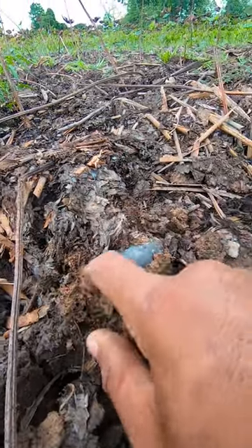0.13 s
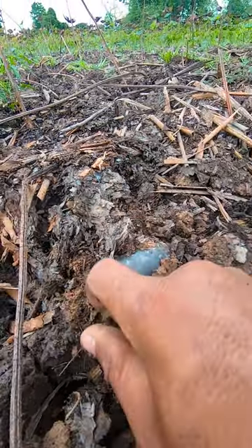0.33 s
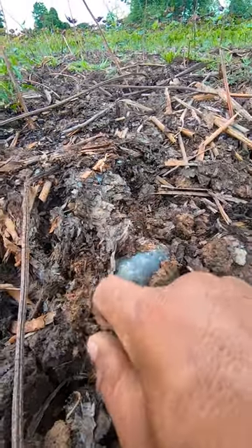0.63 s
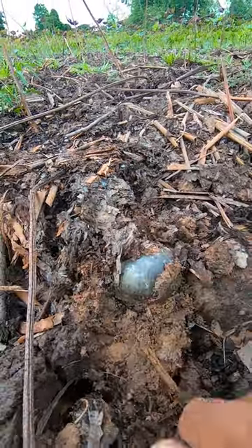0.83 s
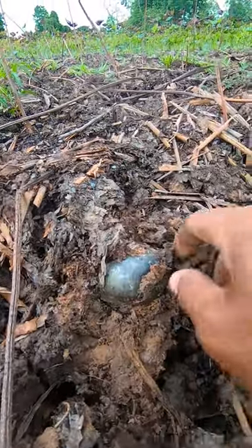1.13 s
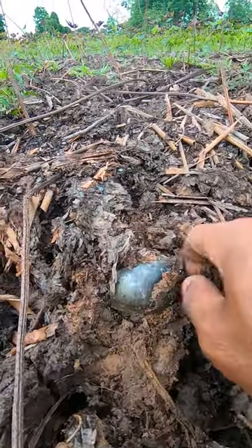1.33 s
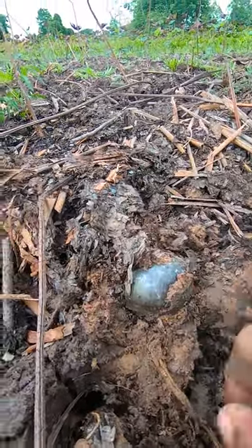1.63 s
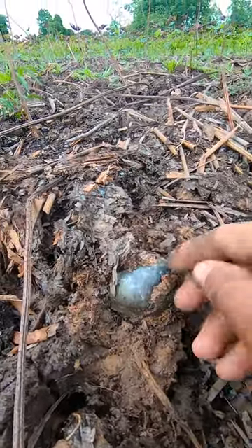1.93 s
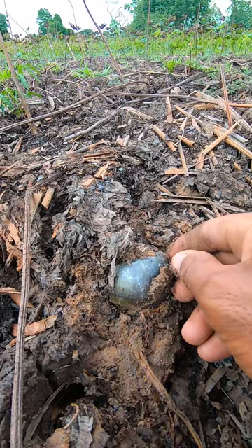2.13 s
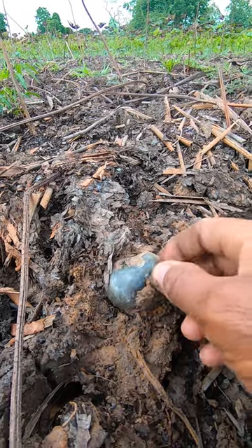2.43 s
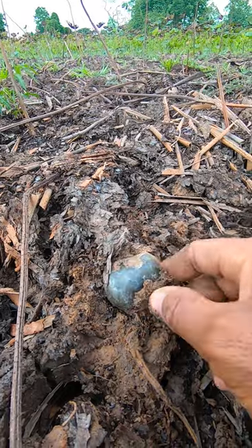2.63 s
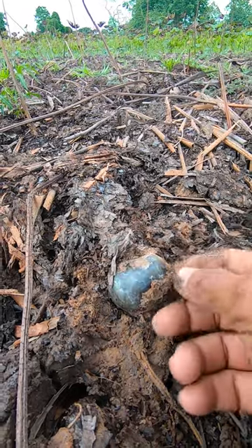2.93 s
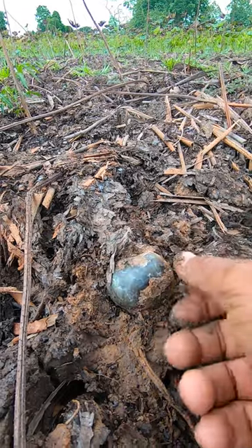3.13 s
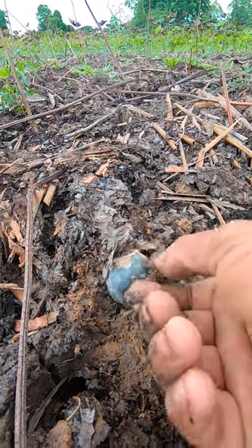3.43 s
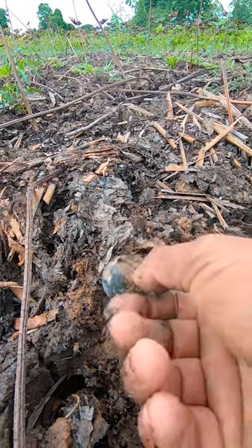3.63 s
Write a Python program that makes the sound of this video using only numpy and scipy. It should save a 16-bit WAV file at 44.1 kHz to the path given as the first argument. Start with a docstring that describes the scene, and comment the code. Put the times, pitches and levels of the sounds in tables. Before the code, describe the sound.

Gritty hand digging in dry earth with snapping twigs and crumbling grains, busiest from 0.8 to 1.9 seconds, then sparse light touches; open field, far hooting bird, soft wind buffeting the close stereo microphone.

```python
"""Outdoors, over a faint wide hush, a light wind booms in the housing of a small stereo microphone.
Far off one bird hoots in groups of three or four, and other birds whistle in short glides (sines, echoed).
A hand scrapes dry soil and litter, lightly at first, then digs hardest near 1.6 s and eases off:
trains of tiny rings for the breaking grains, with ticks, rings and dust puffs for snapping twigs."""
import sys
import numpy as np
from scipy import signal
from scipy.io import wavfile
from scipy.ndimage import uniform_filter1d

SR = 44100
rng = np.random.default_rng(int(sys.argv[2]) if len(sys.argv) > 2 else 0)


def linear_from_db(decibels):
    """Turn decibels (scalar or array-like) into linear amplitude factors; 0 gives 1."""
    return 10 ** (np.asarray(decibels, float) / 20)


def waveform_to_disk(signal):
    """Save audio, clipped to [-1, 1], as 16-bit WAV at the path in sys.argv[1]."""
    frames = np.transpose(np.atleast_2d(signal))
    scaled = np.clip(frames, -1, 1) * 32767
    samples = np.round(scaled).astype(np.int16)
    wavfile.write(sys.argv[1], SR, samples)


N = 166257


def evened(x):
    """Scales to unit rms."""
    return x / np.sqrt(np.mean(x ** 2) + 1e-20)


def read(points, hz):
    """Interpolates a spectrum table on a log-frequency axis."""
    f, value = np.transpose(points)
    return np.interp(np.log(hz + 1), np.log(f + 1), value)


def curve(table, t, axis):
    """One column of a control table at times t."""
    rows = np.array(table)
    return np.interp(t, rows[:, 0], rows[:, axis])


def drift(size):
    """Slow random curve of unit rms, smoothed twice over size samples."""
    once = uniform_filter1d(rng.standard_normal(N), size=size)
    return evened(uniform_filter1d(once, size=size))


def add(mix, s, sound):
    """Mixes a mid-side sound in at time s."""
    part = mix[:, round(s * SR):][:, :sound.shape[1]]
    part += sound[:, :part.shape[1]]


def ping(hz, cycles):
    """A ring of a few cycles that starts and dies softly, peak near 1."""
    u = np.arange(int(4 * cycles * SR / hz) + 8) * hz / SR / cycles
    envelope = (1.45 * np.e * u) ** 2 * np.exp(-3 * u)
    return envelope * np.sin(2 * np.pi * cycles * u)


def field(shape_db, patch_db, size):
    """Mid and side noise from a level field over frequency and time, with drifting patches."""
    hop = size // 4
    hz = np.fft.rfftfreq(size, 1 / SR)[:, None]
    t = np.arange(N // hop + 5) * hop / SR
    a, b, c, d, patch = rng.standard_normal((len(t), len(hz), 5)).T
    patch = uniform_filter1d(patch, size=8, axis=0)
    patch = evened(uniform_filter1d(patch, size=8, axis=1))
    z = np.array([a + 1j * b, c + 1j * d]) * linear_from_db(shape_db(hz, t) + patch_db * patch)
    return signal.istft(z, nperseg=size, noverlap=size - hop)[1][:, :N]


def air():
    """The faint wide hush of the open field: shaped noise, independent in mid and side."""
    # spectra, relative: (frequency [Hz], level [dB per Hz])
    mid_spectrum = [(260, -36.5), (450, -33), (548, -3), (768, 9), (1190, -8.5), (3610, -15), (6340, -7.5),
                    (8890, -11.5), (10400, -29), (11000, -47.5), (13000, -62.5)]
    side_spectrum = [(260, -35.5), (450, 0), (572, -10.5), (747, 5.5), (1140, -8.5), (1600, -10),
                     (3370, -26), (5670, -25.5), (8520, -33), (11000, -39.5), (13000, -69.5)]
    mid_rms_db, side_rms_db, patch_db = -78.5, -69.5, 3.5

    def shape_db(hz, t):
        return np.array([read(mid_spectrum, hz), read(side_spectrum, hz)])

    mid, side = field(shape_db, patch_db, size=1024)
    return np.array([linear_from_db(mid_rms_db) * evened(mid), linear_from_db(side_rms_db) * evened(side)])


def note(db, hz, side_db, rise):
    """A soft-edged sine on the pitch curve hz, wavering and flickering with the air on its way."""
    waver_share, flicker_db_per_hz = .004, .0006
    u = np.linspace(0, 1, len(hz))
    slow = uniform_filter1d(rng.standard_normal((2, len(hz))), size=300)
    waver, flicker = evened(uniform_filter1d(slow, size=300))
    phase = 2 * np.pi * np.cumsum(hz * (1 + waver_share * waver)) / SR
    envelope = np.minimum(np.minimum(u / rise, 6 * (1 - u)), 1)
    level = linear_from_db(db + flicker_db_per_hz * hz * flicker) * np.sqrt(2) * envelope
    return level * np.array([np.sin(phase), linear_from_db(side_db) * np.cos(phase)])


def birds():
    """Hoots rise into their pitch; whistles glide; trees return a blurred echo."""
    # hooting bird: (start [s], length [s], mid level [dB], peak pitch [Hz])
    hoots = [(0.116, 0.067, -79.5, 955), (0.257, 0.08, -70.5, 957), (0.382, 0.078, -66.5, 978),
             (0.507, .062, -66.5, 990), (1.216, 0.062, -71, 952), (1.344, 0.056, -66, 983),
             (1.469, 0.038, -63.5, 980), (2.148, 0.053, -69.5, 924), (2.27, 0.05, -66, 968),
             (2.388, 0.047, -63.5, 979), (3.086, 0.057, -74, 937), (3.203, 0.057, -70.5, 984),
             (3.325, 0.052, -68.5, 973)]
    # other birds: (start [s], length [s], mid level [dB], first pitch [Hz], last pitch [Hz])
    whistles = [(.21, 0.09, -84, 1475, 1560), (.318, 0.12, -75.5, 1500, 1570), (0.21, 0.16, -80, 1030, 990),
                (0.499, .14, -80, 4170, 4440), (1.392, 0.06, -68, 3330, 3070),
                (1.85, 0.052, -69.5, 1894, 2100), (1.955, 0.032, -70, 2120, 1920),
                (2.955, 0.21, -87, 5200, 5700), (3.09, 0.08, -88, 5100, 5300),
                (2.965, 0.075, -86, 4600, 4550), (3.165, 0.05, -79, 4950, 4680),
                (3.474, 0.028, -73.5, 2980, 2870), (3.504, 0.05, -69, 3340, 3030),
                (3.548, 0.039, -80, 3010, 3130), (3.724, 0.021, -72.5, 2760, 2770),
                (3.749, 0.026, -69, 3350, 3090)]
    hoot_arch, hoot_side_db, hoot_rise = .11, -1, .3  # rise: share of a note spent swelling
    whistle_side_db, whistle_rise = -7.5, 0.1
    echo_db, echo_decay_s = -9, 0.048
    out = np.zeros((2, N))
    for s, length_s, db, hz in hoots:
        u = np.linspace(0, 1, int(length_s * SR))
        pitch_hz = hz * (1 - hoot_arch * (1.7 * u - 1) ** 2)
        add(out, s, note(db, pitch_hz, hoot_side_db, hoot_rise))
    for s, length_s, db, first_hz, last_hz in whistles:
        pitch_hz = np.linspace(first_hz, last_hz, int(length_s * SR))
        add(out, s, note(db, pitch_hz, whistle_side_db, whistle_rise))
    t = np.arange(SR // 4) / SR
    echo = rng.standard_normal((2, len(t))) * np.exp(-t / echo_decay_s)
    echo = echo / np.linalg.norm(echo[0])
    return out + linear_from_db(echo_db) * signal.fftconvolve(out, echo, axes=1)[:, :N]


def wind():
    """Gusts excite a broad low resonance, almost alike at both ports, with a deeper flutter under it."""
    # gusts: (time [s], boom level [dB], low flutter share [dB, about its mean])
    gusts = [(0.02, -33, -18), (0.21, -37.5, -10), (0.53, -27.5, -20), (0.7, -42.5, -3), (0.75, -35, -13),
             (1.04, -40, -16.5), (1.52, -37, -13), (1.97, -41.5, -17), (2.11, -40.5, -10.5),
             (2.14, -37.5, -26.5), (2.88, -43, -16.5), (2.95, -47, -12), (3.45, -36, -30), (3.48, -34, -16),
             (3.74, -35.5, -18)]
    # boom spectrum, relative: (frequency [Hz], level [dB per Hz])
    boom = [(18, -44.5), (34, -38), (54, -15.5), (108, -16), (143, -4.5), (176, 4), (208, -4.5),
            (436, -38.5), (515, -55), (560, -58), (730, -79), (1230, -120)]
    # boom width: (frequency [Hz], side over mid [dB])
    boom_width = [(40, -29.5), (100, -19.5), (170, -35), (300, -13.5), (500, -6.5)]
    flutter_below_hz, patch_db = 110.9, 0.94
    top_above_hz, top_follows = 250, .4  # the top follows this share of the gusts' dB swing
    side_lean = -0.048

    def shape_db(hz, t):
        gust_db, flutter_db = curve(gusts, t, axis=1), curve(gusts, t, axis=2)
        mid_db = read(boom, hz) - 200 * (hz > boom[-1][0])  # silent above the table
        mid_db = mid_db + (hz < flutter_below_hz) * (flutter_db - flutter_db.mean())
        mid_db = mid_db - (hz > top_above_hz) * (1 - top_follows) * (gust_db - gust_db.mean())
        return np.array([mid_db, mid_db + read(boom_width, hz)])

    mid, side = field(shape_db, patch_db, size=4096)
    level = linear_from_db(curve(gusts, np.arange(N) / SR, axis=1))
    return np.array([mid, side + side_lean * mid]) / np.std(mid) * level


def snaps():
    """Twigs and crumbs snap: each is a tick, a short ring and a puff of loosened dust."""
    # (time [s], ring level before panning [dB], ring centre [Hz], ring length [cycles], left over right [dB])
    snap_table = [(0.047, -48.5, 4180, 5.6, 1), (0.1804, -38.5, 9000, 4.8, -2.5),
                  (0.2944, -40.5, 6260, 1.9, 10.5), (.47, -42, 6130, 2.1, 13), (0.49, -41, 5930, 2.9, 9),
                  (0.823, -29, 6000, 0.46, -7), (0.858, -43, 4500, .5, -9), (0.822, -38, 1670, 0.88, -18),
                  (0.858, -37.5, 1320, 1, -10), (.899, -47.5, 1490, 4.2, -18), (.927, -45, 5100, 2.1, 2),
                  (.961, -37, 5000, .5, 10), (1.031, -43.5, 1330, 1.3, -14), (1.09, -48, 2580, 4.1, 2),
                  (1.211, -32.5, 2670, 2.1, -6), (1.243, -45.5, 2580, 4.4, -3),
                  (1.275, -39.5, 3040, 3.9, -2), (1.31, -47, 3220, 1.8, 1), (1.338, -38.5, 5030, 1.1, 5),
                  (1.381, -44, 4500, .6, -2), (1.243, -43, 7000, .6, -3), (1.534, -50, 2100, 2, -3),
                  (1.5541, -35, 1070, 1.05, -18), (1.563, -30, 3450, 5, -3),
                  (1.6025, -29, 1260, 1.35, -7.5), (1.6578, -22, 5070, 0.4, -4), (1.702, -44, 1390, 2, -10),
                  (1.743, -44.5, 2570, 1.1, -10), (1.711, -46, 1680, 1.8, -11), (1.807, -55, 5500, 2.4, 0),
                  (1.932, -46.5, 2800, 1, -6), (2.249, -51, 5500, 1, 1), (2.231, -40, 6400, 2, -7.5),
                  (2.398, -36, 6740, 1.4, -13.5), (2.398, -44.5, 820, 1.5, -12), (2.619, -50, 4750, 1.5, 4),
                  (2.6466, -40, 7000, 1.3, 14), (2.466, -50.5, 3200, 0.87, -3), (3.165, -50.5, 6000, 4, 5),
                  (3.2921, -47, 1500, 0.77, -5), (3.461, -45, 7500, 2, 13.5), (3.509, -58, 4500, .5, 0)]
    tick_db, tick_hz = -5, 7000
    dust_db, dust_decay_s, dust_cycles = -17, .003, .7
    left_lag_s = .00005
    out, t = np.zeros((2, N)), np.arange(2000) / SR
    tick = ping(tick_hz, 0.3)
    noise = rng.standard_normal((len(snap_table), len(t)))
    for (s, db, hz, cycles, pan_db), puff in zip(snap_table, noise):
        ring = ping(hz, cycles)[:len(t)]
        speck = ping(hz, dust_cycles)
        dust = np.convolve(puff, speck / np.linalg.norm(speck))[:len(t)]
        x = linear_from_db(dust_db) * np.exp(-t / dust_decay_s) * dust
        x[:len(ring)] += ring
        x[:len(tick)] += linear_from_db(tick_db) * tick
        left = linear_from_db(pan_db / 2) * np.interp(t - left_lag_s, t, x, left=0)
        right = linear_from_db(-pan_db / 2) * x
        add(out, s, linear_from_db(db) * np.array([left + right, left - right]) / 2)
    return out


def scrape():
    """Clumped grains of many sizes break under the fingers, each from its own direction."""
    # hand: (time [s], pressure [dB], brightness [dB per octave], clod share [dB], left over right [dB])
    hand = [(.02, -67.5, 0, -12, -4), (.06, -67.5, 4.5, 5, -1), (.14, -73.5, 3.5, -2, 0),
            (.19, -80, -1.5, -7, 1), (.28, -78.5, 1.5, 8.5, -3), (.32, -71, 2, 1, -3),
            (.43, -73, 1, 3.5, -2), (.47, -59, 3, 2, -4), (.52, -75, -2.5, 0.5, -2),
            (.69, -78.5, 2.5, -1.5, -1), (.76, -61.5, -2, -7, -2), (.79, -50.5, -1.5, -4.5, -8),
            (.89, -52.5, -2, -2.5, -5), (.93, -57.5, 1, 0.5, -9.5), (1.12, -56.5, -2, -11.5, -1),
            (1.17, -59.5, 2, -1.5, -3), (1.37, -60, 1.5, -14, -2.5), (1.41, -70, 1, -2, -1),
            (1.46, -61.5, 1.5, -3, -1), (1.52, -57, 0.5, 2.5, -3), (1.562, -40, -3.5, -7, -4.5),
            (1.593, -46, -2.5, -5, -5), (1.665, -50, -2, -5, -9), (1.71, -60.5, 0, -0.5, -5.5),
            (1.83, -59.5, 0, -7.5, -14), (1.88, -67.5, 1.5, -3, -4), (2.02, -74, -5, -10, -1),
            (2.16, -77, -2.5, -10, 0), (2.18, -60.5, -2.5, -9.5, -1), (2.26, -72.5, -1, 4, 0),
            (2.31, -77, 1.5, 0, -1), (2.4, -60, -3, -7.5, 0), (2.53, -82.5, 3, 4.5, 1),
            (2.67, -60, 2, -3.5, -3.5), (2.73, -69.5, 1, -7, -3), (2.82, -79.5, -1, -7, 0),
            (2.93, -73.5, 1.5, -2, -1), (3.1, -83, -3.5, -7, 1), (3.17, -72.5, 3, 3, -1),
            (3.27, -82.5, -5, -8, 1), (3.36, -79.5, -2, -4, 2), (3.48, -69, 3, 1, 0),
            (3.57, -73, -2.5, -8.5, -1.5), (3.65, -74.5, 3.5, -4, 1.5), (3.74, -75.5, -2.5, -11, 0.5)]
    # grit spectrum, relative: (frequency [Hz], level [dB per Hz])
    grit = [(290, -34.5), (500, -2), (620, -6.5), (888, 2.5), (1750, -5), (3330, -1.5), (4020, -4.5),
            (5510, -3.5), (9240, -11), (12100, -19.5), (15500, -26.5)]
    # grit width: (frequency [Hz], side over mid [dB])
    grit_width = [(600, -10.5), (1300, 1.5), (2500, -9.5), (4400, -7), (8000, 2), (15000, -5)]
    clod_below_hz, pivot_hz, colour_drift_db = 1500, 3830, 2.5
    grains_per_s, grain_spread_db, grain_cycles = 1400, 3.2, 3.3  # rates are before clumping, per size
    cracks_per_s, crack_spread_db, crack_cycles, crack_db = 160, 5, 1.11, -8.5
    clump_db = 4.0
    stalk_start_s, stalk_end_s, stalk_hz, stalk_db = 0.9, 1.3, 2760, 6
    fine_above_hz, fine_follows, firm_db = 9540, 0.45, -50.5

    t, out = np.arange(N) / SR, np.zeros((2, N))
    pressure_db, bright_db, clod_db = [curve(hand, t, axis=k) for k in (1, 2, 3)]
    lean = np.tanh(curve(hand, t, axis=4) * np.log(10) / 40)  # side over mid
    clump = linear_from_db(clump_db * drift(size=500))
    # fingers drag over hollow stalks, which ring at one pitch
    stalks_db = stalk_db * np.clip(np.minimum(t - stalk_start_s, stalk_end_s - t) / 0.06, 0, 1)
    sizes_hz = np.geomspace(440, 14500, num=26)
    weights = linear_from_db(read(grit, sizes_hz)) * np.sqrt(sizes_hz)
    weights = weights / np.linalg.norm(weights)

    # larger crumbs crack at all pitches at once
    crack_size = linear_from_db(crack_spread_db * np.minimum(rng.exponential(size=N), 3.2))
    cracks = (rng.random(N) < cracks_per_s * clump / SR) * crack_size
    cracks = linear_from_db(crack_db) * evened(cracks)
    crack_way = rng.standard_normal(N)

    for hz, weight in zip(sizes_hz, weights):
        draw, big, way = rng.random(N), rng.exponential(size=N), rng.standard_normal((2, N))
        sign = np.sign(way[0])
        grain_size = linear_from_db(grain_spread_db * np.minimum(big, 5))
        grains = evened((draw < grains_per_s * clump / SR) * grain_size * sign)

        colour_db = bright_db * np.log2(hz / pivot_hz) + (hz < clod_below_hz) * clod_db
        colour_db = colour_db + stalks_db * np.exp(-(np.log2(hz / stalk_hz) / 0.29) ** 2)
        colour_db = colour_db + colour_drift_db * drift(size=1500)
        if hz > fine_above_hz:  # the finest grit needs pressure
            colour_db = colour_db + fine_follows * (pressure_db - firm_db)
        level = weight * linear_from_db(pressure_db + colour_db)

        width = linear_from_db(read(grit_width, hz))
        layers = [(grains, way[1], grain_cycles), (cracks * sign, crack_way, crack_cycles)]
        for hits, direction, cycles in layers:
            ring = ping(hz, cycles)
            both = level * hits * np.array([np.ones(N), lean + width * direction])
            out += signal.oaconvolve(both, ring[None] / np.linalg.norm(ring), axes=1)[:, :N]
    return out


def scene():
    """All sources in mid and side, turned into left and right."""
    mid, side = air() + birds() + wind() + snaps() + scrape()
    return np.array([mid + side, mid - side])


def top_cut(x):
    """Nothing passes above the cut-off."""
    return signal.sosfilt(signal.butter(12, 15690, fs=SR, output="sos"), x)


def record(dry):
    """A linear-phase low-pass limits the band."""
    edge_hz = 15400
    low_pass = signal.firwin(511, edge_hz, window=("kaiser", 9), fs=SR)
    mix = signal.oaconvolve(dry, low_pass[None], "same")
    return top_cut(mix)


dry = scene()
out = record(dry)
waveform_to_disk(out)
```